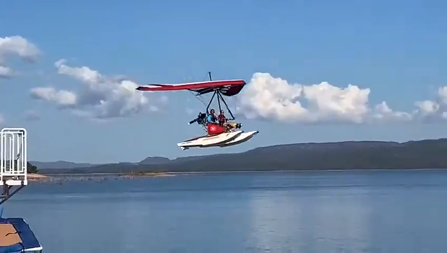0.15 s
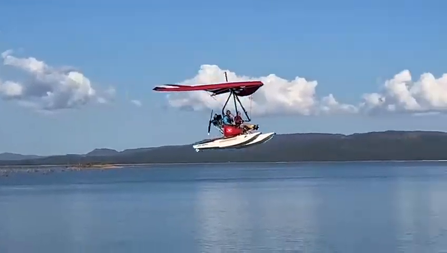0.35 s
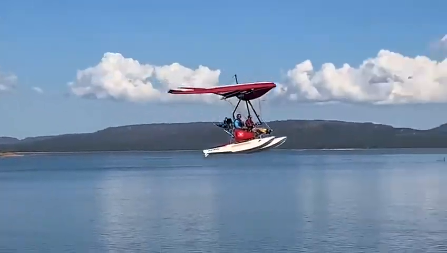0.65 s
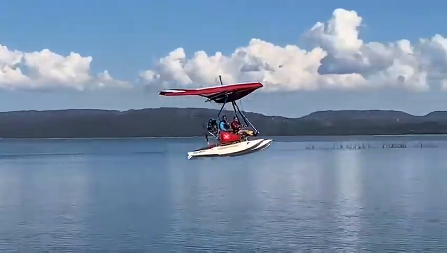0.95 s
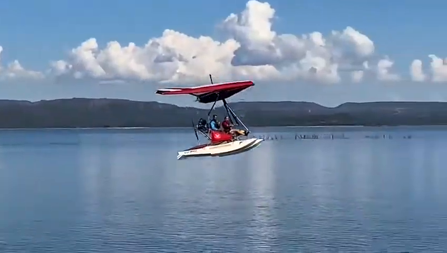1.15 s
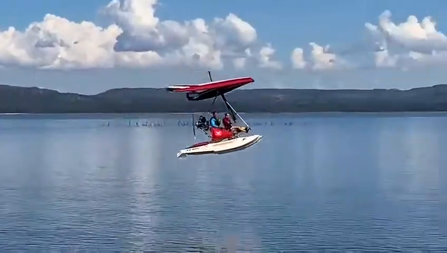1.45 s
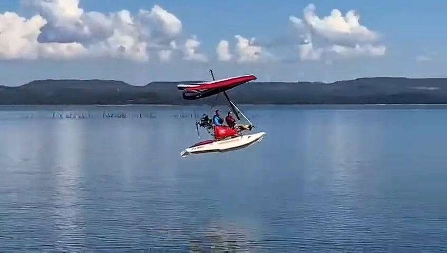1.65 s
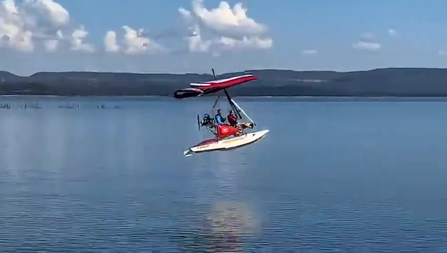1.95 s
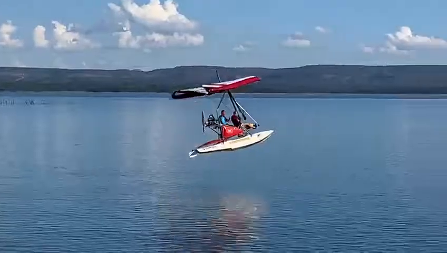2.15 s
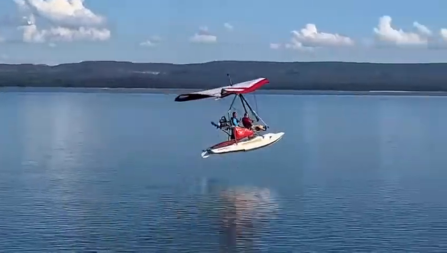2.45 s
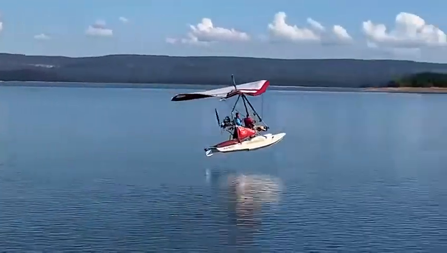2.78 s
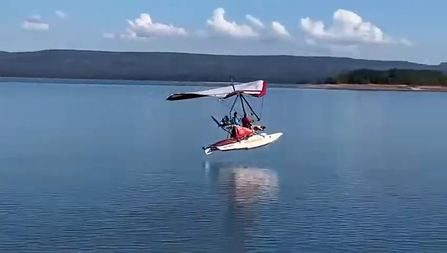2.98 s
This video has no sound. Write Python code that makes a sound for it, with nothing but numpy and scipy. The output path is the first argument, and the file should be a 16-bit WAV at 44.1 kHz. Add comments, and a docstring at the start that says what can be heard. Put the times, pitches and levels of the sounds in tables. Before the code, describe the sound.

A microlight's raspy engine drone grows louder and drops in pitch as it flies by.

```python
"""Microlight passing over a lake

A microlight on floats flies low past the listener; its two-stroke drone swells and sinks in pitch.
The exhaust gives clean low tones and a pulsing rasp, and the geared propeller swishes once a turn.
A machine hums nearby, a bird pips far off, and wind puffs and soft bumps reach a two-port microphone."""
import sys
import numpy as np
from scipy import signal
from scipy.fft import rfft, irfft, next_fast_len
from scipy.io import wavfile
from scipy.ndimage import map_coordinates

SR = 44100
rng = np.random.default_rng(int(sys.argv[2]) if len(sys.argv) > 2 else 0)


def to_wav(s):
    """Save 16-bit WAV."""
    ch = np.atleast_2d(s).T  # columns
    pcm = np.round(np.clip(ch, -1, 1) * 32767)  # PCM
    wavfile.write(sys.argv[1], SR, pcm.astype(np.int16))


N = 137592
GEAR = 2.58  # crank turns per propeller turn


def exhaust(turns):
    """Directivity: the firing tones, locked to the crank, grow as the pipe turns towards the listener."""
    # swell of the exhaust: t/s, level/dB
    swell = [(0, -15), (.45, -19.5), (.8, -12), (1.1, -6.5), (1.4, -4), (1.7, -0.5), (2.2, -0.45),
             (2.6, 1.5), (3.12, 1)]
    # partials: multiple of the crank rate, level/dB at a swell of 0 dB, factor on the swell, flutter/dB
    partials = [(.5, -50.5, -.6, 3), (1, -41.5, -0.2, 1.5), (1.5, -62, 0, 2.5), (2, -33, 0.98, 0.6),
                (2.5, -58.5, -.15, 1), (3, -34, 0.89, 0.5), (4, -50.5, 3, 1.3), (5, -66.5, -0.45, 3),
                (6, -63.5, 0, 2), (8, -67, 0, 2.5), (9, -65, 0.21, 2.5), (13, -63.5, 1, 1.5)]
    swell_db, mean_crank_hz = curve(swell), turns[-1] * SR / N
    out = 0
    for k, db, factor, flutter_db in partials:
        wander = .016 * flutter_db * wobble(14)  # phase/turns
        gain = amp(db + factor * swell_db + flutter_db * wobble(13))
        out = out + gain * tone(k * turns + wander, k * mean_crank_hz)
    return out


def rasp(turns):
    """Broadband flow noise: rumble below, pulsing gas and buzz above, coloured by the craft's angle."""
    # spectra of the craft coming, abeam and going: f/Hz, relative level/dB
    coming = [(25, -77), (48, -59), (100, -64.5), (130, -65.5), (170, -57), (290, -73.5), (340, -68),
              (430, -77.5), (720, -70), (900, -75.5), (1030, -79.5), (1150, -73.5), (1400, -80.5),
              (2300, -84.5), (2800, -85.5), (3150, -90.5), (4200, -93), (5700, -85.5), (7400, -97),
              (8600, -89), (9200, -102), (9700, -120)]
    abeam = [(25, -77.5), (48, -57.5), (100, -61), (130, -74), (160, -59), (290, -67.5), (340, -81),
             (430, -77.5), (560, -77), (700, -76), (900, -76.5), (1020, -85), (1200, -82), (1750, -78),
             (2030, -86), (2400, -87), (3150, -85), (4000, -90), (5700, -93.5), (7100, -90), (7700, -102),
             (8700, -100), (9300, -120)]
    going = [(25, -79), (70, -55), (120, -63), (200, -62.5), (310, -65.5), (400, -80.5), (560, -78),
             (800, -77.5), (950, -86.5), (1140, -79), (1380, -77.5), (1510, -93.5), (1650, -79.5),
             (2000, -84), (2400, -79.5), (3100, -80.5), (3800, -86), (4700, -92), (5700, -86.5),
             (8200, -92), (8900, -98), (9600, -118)]
    alone_s = (0.28, 1.15, 2.2)  # when each spectrum holds alone
    buzz_share, crossover_hz = 0.12, 522
    gas = unit(pulsing(turns) * rng.standard_normal((2, N)))
    buzz_band = 2 * 31 * turns[-1] / N  # fraction of the spectrum spanned by 31 harmonics
    gas[0] += np.sqrt(buzz_share * buzz_band) * pipe_buzz(turns)
    gas = patchy(gas) * amp(wobble(23.8))
    upper = lambda hz: 1 / (1 + (crossover_hz / (hz + 1)) ** 8)
    rumble = filtered(rng.standard_normal((2, N)), lambda hz: np.sqrt(1 - upper(hz)))
    source = rumble + filtered(gas, lambda hz: np.sqrt(upper(hz)))
    out = 0
    for weights, colour in zip(np.eye(3), (coming, abeam, going)):
        fade = curve(list(zip(alone_s, weights)))
        out = out + fade * coloured(source, colour)
    return amp(-2) * np.sqrt(SR / 2) * out


def pulsing(turns):
    """Amplitude modulation of the gas noise: one short spurt above the steady flow per crank turn."""
    depth, sharpness = .7, 3.2
    return unit(1 + depth * np.exp(sharpness * (np.cos(2 * np.pi * turns) - 1)))


def pipe_buzz(turns):
    """Harmonic series: upper multiples of the crank rate, each wavering on its way through the air."""
    out = 0
    for k in range(7, 38):
        gain = amp(4.5 * wobble(10))
        phase = k * turns + rng.random() + 0.046 * wobble(14)
        out = out + gain * np.cos(2 * np.pi * phase)
    return unit(out)


def formants(turns):
    """Formants: five narrow bands of the rasp glide, swell and fade with the angle of the craft."""
    # tracks of the band centres, lowest first: t/s, f/Hz, level/dB
    bark = [(0, 730, -47.5), (.16, 732, -50.5), (.34, 755, -45.5), (.5, 788, -50), (.68, 838, -46.5),
            (.85, 850, -53), (1.1, 890, -55), (1.55, 873, -65.5), (2.15, 780, -56), (2.6, 787, -67.5),
            (3.1, 825, -54)]
    growl = [(.9, 1180, -69.5), (1.35, 1171, -53.5), (1.6, 1170, -53), (1.95, 1152, -66), (2.3, 1135, -55),
             (3.1, 1142, -51)]
    nasal = [(0, 1720, -61.5), (.6, 1745, -61.5), (1.15, 1703, -49), (1.5, 1684, -55.5), (1.8, 1660, -49.5),
             (2.2, 1653, -60.5), (2.75, 1660, -58), (3.08, 1676, -49)]
    edge = [(0, 2246, -61.5), (.5, 2325, -56.5), (.85, 2363, -50), (1.03, 2406, -52.5), (1.17, 2360, -67),
            (1.35, 2215, -57), (1.5, 2210, -68), (1.8, 2320, -50.5), (2.03, 2340, -54), (2.5, 2295, -69.5),
            (3.1, 2330, -50.5)]
    sizzle = [(1, 2790, -73), (1.33, 2760, -52), (1.52, 2780, -64), (1.72, 2706, -51), (1.95, 2905, -71),
              (2.5, 2985, -55.5), (3.1, 3050, -58)]
    return (ringing(turns, bark, width_hz=250, buzz=0.07)
            + ringing(turns, growl, width_hz=130, buzz=.15)
            + ringing(turns, nasal, width_hz=103, buzz=0.32)
            + ringing(turns, edge, width_hz=223, buzz=0.11)
            + ringing(turns, sizzle, width_hz=190, buzz=0.08))


def ringing(turns, track, width_hz, buzz):
    """Forced resonance: gas noise and some buzz drive one narrow band whose centre glides."""
    s, hz, db = np.transpose(track)
    carrier = np.exp(2j * np.pi * np.cumsum(curve(np.c_[s, hz])) / SR)
    # shift the centre to 0 Hz, low-pass, shift back
    drive = (buzz * pipe_buzz(turns) + rng.standard_normal(N)) / carrier
    re, im = filtered(np.array([drive.real, drive.imag]), lambda f: 1 / (1 + 2j * f / width_hz) ** 2)
    band = unit(pulsing(turns) * np.real((re + 1j * im) * carrier))
    return filtered(amp(curve(np.c_[s, db])) * band, lead)


def propeller_swish(turns):
    """Modulated flow noise: one burst of hiss for each propeller turn, uneven in strength."""
    # strength of the swish: t/s, level/dB
    swish = [(0, -64), (.75, -61), (1.35, -70), (1.8, -62.5), (2.25, -52.5), (2.7, -55), (3.12, -58)]
    # its spectrum: f/Hz, relative level/dB
    colour = [(500, -28.5), (1500, -1.5), (2900, -17), (4000, -5.5), (5500, -13), (6800, 4), (8100, 3.5),
              (8900, -1), (9700, -19.5)]
    sharpness, peak_turn = 1.1, -.07
    burst = np.exp(sharpness * np.cos(2 * np.pi * (turns / GEAR - peak_turn)))
    burst *= amp(3.6 * wobble(30.15))
    hiss = coloured(patchy(burst * rng.standard_normal((2, N))), colour)
    return amp(curve(swish)) * unit(hiss)


def blades(turns, db=-54.5, waver_db=6.5):
    """Blade-passing tone: a low throb at twice the rotation rate of the two-bladed propeller."""
    passes = 2 * turns / GEAR
    return amp(db + waver_db * wobble(5.5)) * tone(passes, passes[-1] * SR / N)


def patchy(x, depth_db=1.1, patch_hz=260, patch_s=.16):
    """Frequency-selective fading: air and water make patches of the spectrum swell and fade."""
    hz, s, spectrum = signal.stft(x, SR, nperseg=512)
    knots = rng.standard_normal((300, 100))
    field = map_coordinates(knots, np.meshgrid(hz / patch_hz, s / patch_s, indexing="ij"), mode="wrap")
    return signal.istft(spectrum * amp(depth_db * field), SR, nperseg=512)[1][:, :N]


def machine(waver_db=1.5):
    """Periodic vibration: a nearby machine hums in harmonics that waver slightly."""
    # harmonics: f/Hz, level/dB
    hum = [(120.1, -53.5), (240.2, -48.5), (360.3, -58), (480.3, -63), (720.6, -65), (960.8, -73.5)]
    t = np.arange(N) / SR
    return sum(amp(db + waver_db * wobble(4.2)) * tone(hz * t + 0.013 * wobble(6.2), hz)
               for hz, db in hum)


def bird():
    """Tone bursts with phase jitter: four quick pips and one thin higher note, far off."""
    # pips: t/s, f/Hz, level/dB, half length/s
    pips = [(0.33, 2775, -45.5, 0.008), (0.48, 2780, -50, 0.013), (0.616, 2830, -48, 0.0076),
            (0.752, 2760, -47.5, 0.0071), (1.05, 4630, -60.5, 0.047)]
    t = np.arange(N) / SR
    return sum(amp(db) * gaussian(s, half) * tone(hz * t + 0.14 * wobble(140), hz)
               for s, hz, db, half in pips)


def wind():
    """Turbulent pressure: short low puffs, uncorrelated between the two ports."""
    # puffs: t/s, level/dB, half length/s
    puffs = [(0, -43, 0.035), (0.463, -42.5, 0.025), (0.844, -44.5, 0.071), (1.048, -45, 0.086),
             (1.995, -43.5, 0.076), (2.854, -44, 0.076)]
    # their spectrum: f/Hz, relative level/dB
    colour = [(20, -21.5), (48, 0), (85, 0), (140, -9.5), (300, -26), (900, -69), (3000, -120)]
    envelope = sum(amp(db) * gaussian(s, half) for s, db, half in puffs)
    return envelope * unit(coloured(rng.standard_normal((2, N)), colour))


def thumps():
    """Damped oscillation: soft bumps on the microphone's housing give a few low cycles that sag in pitch."""
    # bumps, alike at both ports: t/s, peak level/dB, starting f/Hz, rise/s
    bumps = [(0.338, -32, 115, 0.016), (1.214, -34.5, 92, .009), (1.706, -37.5, 81, 0.018),
             (1.917, -32.5, 85, 0.0069), (2.63, -34.5, 80.5, 0.0096)]
    sag_s = 0.054  # age at which the pitch has halved
    out = 0
    for s, db, hz, rise in bumps:
        age = np.maximum(np.arange(N) / SR - s, 0)
        cycles = hz * sag_s * np.log1p(age / sag_s)
        envelope = amp(db) * age / rise * np.exp(1 - age / rise)
        out = out + envelope * np.sin(2 * np.pi * cycles)
    return out


def ports(pair, ripple_hz=521, depth=0.27):
    """Interference: direct and scattered sound mix to left and right, rippled by a hard surface nearby."""
    # likeness of the two ports: f/Hz, coherence (0-1)
    coherence = [(40, 0.46), (170, 0.98), (330, 0.48), (440, .6), (600, 0.88), (1300, 0.47), (1480, 0.71),
                 (1650, 0.75), (2400, 0.95), (2650, 0.58), (3250, 1), (4200, 0.35), (5400, 1), (6600, 0.37),
                 (7350, 0.62), (8000, 0.75), (8400, 0.98)]

    def response(hz):
        angle = np.arccos(np.clip(along(coherence, hz), 0, 1)) / 2
        comb = np.abs(1 - depth * np.exp(2j * np.pi * hz / ripple_hz))
        ripple = comb ** np.clip(hz / ripple_hz, 0, 1)  # flattens towards the bass
        return ripple * np.array([np.cos(angle), np.sin(angle)])

    direct, scattered = filtered(pair, response)
    return filtered(np.array([direct + scattered, direct - scattered]), lead)


def lead(hz):
    """Phase difference between the ports, as complex factors for left and right."""
    # lead of the left port: f/Hz, phase/rad
    left_lead = [(90, -3.4), (180, -2.15), (265, -.95), (390, -.1), (570, 3.1), (780, 5.25), (1080, 6.9),
                 (1220, 6.54), (1430, 5.4), (1620, 6.6), (1900, 5.8), (2300, 6.6), (2550, 5.58),
                 (2750, 1.49), (3000, 0.3), (3200, -3), (3600, -5.4), (3800, -9.5), (4500, -12.5),
                 (4900, -15.6), (5450, -15.7), (6400, -14.9), (7000, -13), (7350, -12.6), (7850, -13.3),
                 (8300, -15.7)]
    phase = along(left_lead, hz)
    return np.exp(.5j * np.array([phase, -phase]))


def tone(turns, hz):
    """A stereo sinusoid of rms 1 on a running phase near hz."""
    return np.sqrt(2) * np.real(lead(hz)[:, None] * np.exp(2j * np.pi * (turns + rng.random())))


def amp(db):
    """Decibels to gain."""
    return 10 ** (np.asarray(db) / 20)


def unit(x):
    """Normalisation to rms 1."""
    return x / np.sqrt(np.mean(x ** 2) + 1e-20)


def along(points, hz):
    """Interpolation of (f/Hz, value) points on a log axis."""
    f, v = np.transpose(points)
    return np.interp(np.log(hz + 1), np.log(f + 1), v)


def curve(rows):
    """Interpolation of (t/s, value) points, one value per sample."""
    return np.interp(np.arange(N) / SR, *np.transpose(rows))


def gaussian(centre_s, half_s):
    """A bell-shaped envelope of height 1."""
    return np.exp(-.5 * ((np.arange(N) / SR - centre_s) / half_s) ** 2)


def wobble(rate):
    """A smooth random curve, rate knots a second."""
    knots = rng.standard_normal(int(N * rate / SR) + 4)
    return map_coordinates(knots, [np.arange(N) * rate / SR], mode="nearest")


def filtered(x, response):
    """Linear filtering: the spectrum of x times a complex frequency response."""
    m = next_fast_len(N + SR // 2)
    return irfft(rfft(x, m) * response(np.fft.rfftfreq(m, 1 / SR)), m)[..., :N]


def coloured(x, colour):
    """Spectral shaping by (f/Hz, level/dB) points."""
    return filtered(x, lambda hz: amp(along(colour, hz)))


def scene():
    """Superposition: one crank drives exhaust and propeller; hum, bird, wind and bumps add to them."""
    # crank rate as heard: t/s, f/Hz
    crank = [(0, 100.31), (.3, 97.33), (.85, 93.18), (1.15, 92.69), (1.55, 91.76), (2.1, 90.18),
             (2.5, 87.93), (2.8, 86.83), (3.12, 86.08)]
    turns = np.cumsum(curve(crank)) / SR
    bands = formants(turns)
    aircraft = exhaust(turns) + blades(turns) + bands + ports(rasp(turns) + propeller_swish(turns))
    return aircraft + machine() + bird() + wind() + thumps()


def record(dry, top_hz=9800):
    """Band limiting: a steep low-pass removes the highest treble."""
    return filtered(dry, lambda hz: 1 / (1 + (hz / top_hz) ** 60))


dry = scene()
out = record(dry)
to_wav(out)
```